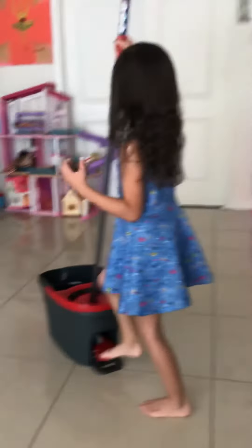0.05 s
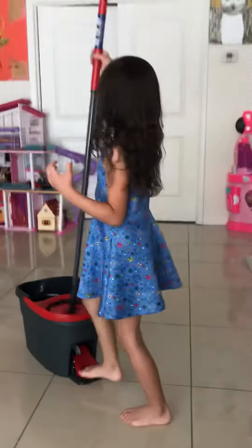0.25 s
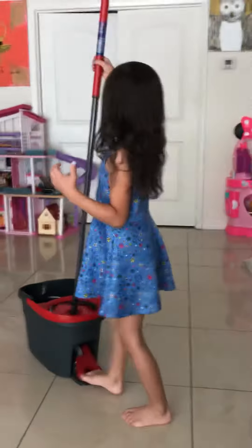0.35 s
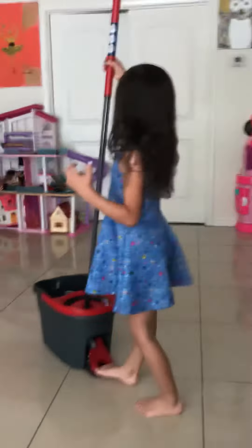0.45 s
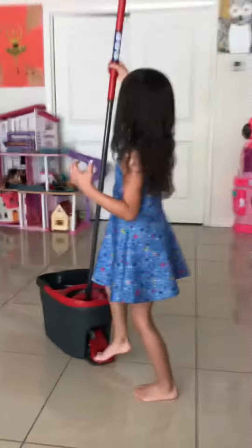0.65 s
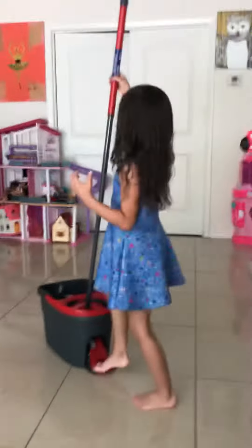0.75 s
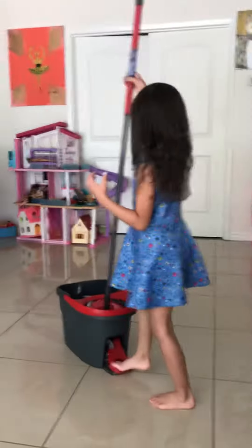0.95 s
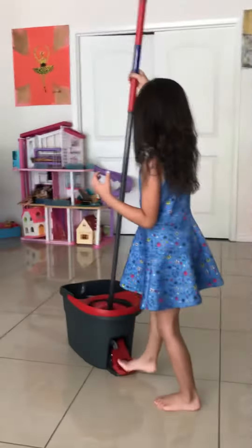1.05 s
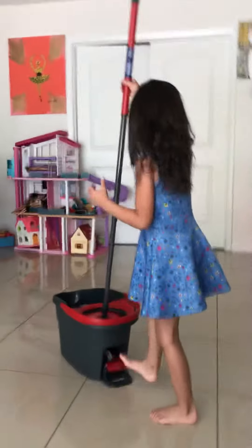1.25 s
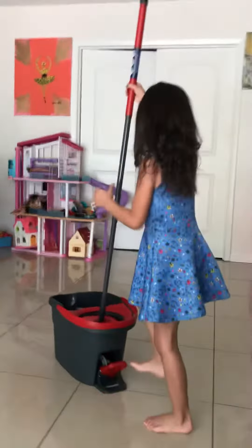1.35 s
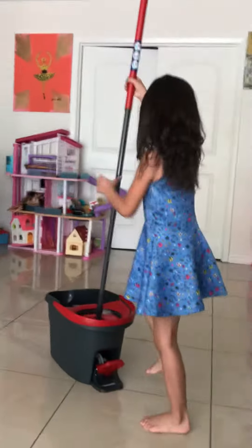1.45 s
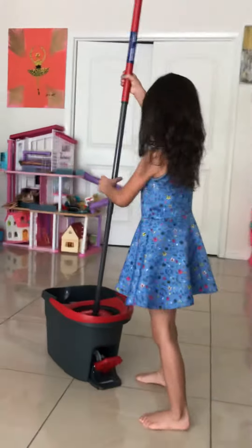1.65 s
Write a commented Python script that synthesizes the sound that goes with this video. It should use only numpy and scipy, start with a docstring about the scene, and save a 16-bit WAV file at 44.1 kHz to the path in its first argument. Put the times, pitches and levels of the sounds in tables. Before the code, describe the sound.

A plastic mop bucket pedal is pressed down with a knock, then clacks back up.

```python
"""One microphone in a live tiled room, a plastic spin-mop bucket on the floor, a faint hum behind it.
The tub is still ringing from a pedal stroke as we come in. At 0.2 s the pedal is trodden down: the
gear rack whirrs and hits its stop. The mechanism ticks, and at 0.84 s a bare foot pats the floor.
At 1.25 s the pedal is let go: the rack rattles back and the pedal clacks against the tub, which
rings hollow into the room."""
import sys
import numpy as np
from scipy import signal
from scipy.fft import rfft, irfft, next_fast_len
from scipy.io import wavfile

SR = 44100
rng = np.random.default_rng(int(sys.argv[2]) if len(sys.argv) > 2 else 0)


def digitize_waveform(pressure):
    """Quantize a signal to 16-bit integers and store it at the path in sys.argv[1].

    Rows of a 2-D input are taken as channels; values are limited to [-1, 1].
    """
    field = np.atleast_2d(pressure).T
    bounded = np.clip(field, -1, 1)
    quanta = np.round(bounded * 32767).astype(np.int16)
    wavfile.write(sys.argv[1], SR, quanta)


N = 74970
LEAD = SR // 4  # samples before time zero, so an earlier stroke can ring on
M = N + LEAD
T = np.arange(M) / SR

def amp(db):
    """Gain of a level in dB."""
    return 10 ** (np.asarray(db) / 20)

def along(points, hz):
    """Read a curve of (Hz, value) points on a log frequency axis."""
    freqs, values = np.transpose(points)
    return np.interp(np.log(hz + 1e-6), np.log(freqs), values)

def norm(x):
    """Scale to energy 1."""
    return x / (np.linalg.norm(x) + 1e-12)

def fade(t60):
    """Exponential decay, 60 dB down after t60 seconds."""
    return np.exp(-np.minimum(np.log(1000) * T / t60, 20))

def rise(seconds):
    """Soft onset with this time constant."""
    return 1 - np.exp(-T / seconds)

def at(start, x):
    """Start x at a time in seconds."""
    return np.pad(x, (max(0, LEAD + round(start * SR)), 0))[:M]

def coloured(x, points, size=4096):
    """Minimum-phase filter through (Hz, dB) points."""
    gain = amp(along(points, np.fft.rfftfreq(size, 1 / SR)))
    cepstrum = irfft(np.log(gain))
    cepstrum[1:size // 2] *= 2
    cepstrum[size // 2 + 1:] = 0
    return signal.oaconvolve(x, irfft(np.exp(rfft(cepstrum))))[:M]

def burst(t60):
    """Dying noise of energy 1."""
    return norm(rng.standard_normal(M) * fade(t60))

def wobble(step):
    """Random drift that turns every step samples."""
    knots = rng.standard_normal(M // step + 2)
    return np.interp(np.arange(M) / step, np.arange(len(knots)), knots)

# The room's air at the microphone. Each row: frequency in Hz, relative level in dB.
AIR_COLOUR = [(20, -51), (40, -15.5), (65, -2), (95, -7), (125, -14.5), (160, -10.5), (220, -20.5),
              (370, -12), (550, -19), (1000, -24), (1400, -25.5), (2200, -28.5), (4500, -34.5), (9000, -40),
              (15500, -49.5)]
def room_tone(hum_hz=60.1):
    """The bed under everything: steady air noise and a low hum."""
    air = coloured(rng.standard_normal(M), AIR_COLOUR)
    hum = np.sqrt(2) * np.sin(2 * np.pi * hum_hz * T)
    return amp(-52.5) * air / air.std() + amp(-65.5) * hum

# How long the tiled room holds a sound. Each row: frequency in Hz, t60 in seconds.
ROOM_T60 = [(100, 0.54), (350, 0.97), (700, .8), (1300, 0.91), (2800, 0.75), (5000, 0.77), (8000, 0.66),
            (15000, 0.56)]
def echo(gap_s=.005):
    """Dense early reflections and the room's tail reach the microphone just after the direct sound."""
    hz, t, spectrum = signal.stft(rng.standard_normal(M), SR, nperseg=256)
    decay = np.exp(-np.log(1000) * t / along(ROOM_T60, hz)[:, None])
    tail = signal.istft(spectrum * decay, SR, nperseg=256)[1][:M]
    early = amp(-8) * burst(t60=.33)
    return (norm(tail) + early) * np.clip(T / gap_s - 1, 0, 1)

def in_room(x, room_db):
    """The direct sound plus what the walls send back."""
    return x + amp(room_db) * signal.oaconvolve(x, echo())[:M]

# Skin slapping tile, and the thud under it. Each row: frequency in Hz, gain in dB.
SLAP_COLOUR = [(300, -2), (1200, 4), (2500, -1.5), (4300, -8), (5500, -5), (7400, -12), (9000, -6.5),
               (11000, -21), (15000, -28)]
THUD_COLOUR = [(30, -19), (90, -3), (250, -9), (480, -3), (700, -23), (2000, -42), (6000, -69)]
def bare_foot(start=.8364):
    """A foot pats the tile: a small slap and a soft thud, dry enough to sound close."""
    slap = amp(-10.5) * at(start, coloured(burst(t60=.0035), SLAP_COLOUR))
    thud = amp(9.5) * at(start + .001, coloured(-1. * (T == 0), THUD_COLOUR))
    return in_room(slap + thud, room_db=-16.5)

# Loose plastic parts. Each row: start in seconds, level in dB, pitch in Hz, t60 in seconds.
TICKS = [(.012, -11, 3470, 0.017), (.111, -19, 3030, 0.019), (0.2311, -15, 4000, .02),
         (.585, -29.5, 9200, .015), (0.651, -22, 3760, 0.047), (.672, -8.5, 2180, 0.11),
         (0.7147, -12.5, 3300, 0.032), (.849, -21, 2800, .015), (1.002, -29, 3000, 0.017),
         (1.132, -18, 1400, 0.035), (1.144, -15, 2210, 0.045), (1.151, -5, 2040, 0.098),
         (1.288, -5, 3000, .015), (1.521, -34, 9000, 0.0091)]
# The spectrum of one tick. Each row: multiple of the pitch, gain in dB.
TICK_SHAPE = [(.06, -10), (.18, 0), (.33, -3.5), (.7, 0), (1, 3), (1.35, -3), (1.9, -11.5), (4, -26.5),
              (8, -36)]
def linkage_ticks():
    """Light contacts of the mop and the pedal linkage, with the room around them."""
    ticks = np.zeros(M)
    for start, db, hz, t60 in TICKS:
        colour = [(hz * multiple, gain) for multiple, gain in TICK_SHAPE]
        ticks += amp(db) * at(start, coloured(burst(t60), colour))
    return in_room(ticks, room_db=-3)

def friction_tone(hz, t60, waver):
    """Rubbing parts give a dying tone of unsteady pitch."""
    pitch = hz * (1 + waver * wobble(step=120))
    return np.sin(2 * np.pi * np.cumsum(pitch) / SR) * fade(t60) * rise(.00062)

def rack(effort, colour, teeth_hz, scrape_db):
    """Teeth click past unevenly, with some scraping between them, and shake the housing."""
    teeth_passed = np.cumsum(teeth_hz * np.exp(.3 * wobble(step=100))) / SR
    clicks = np.diff(np.floor(teeth_passed), prepend=0) * amp(rng.normal(0, 2, M))
    grind = norm(clicks - clicks.mean()) + amp(scrape_db) * norm(rng.standard_normal(M))
    times, levels = np.transpose(effort)
    force = amp(np.interp(T - LEAD / SR, times, levels, left=-120, right=-120))
    return coloured(grind * force, colour) / coloured(grind, colour).std()

# Surges of the gear. Each row: start in seconds, relative level in dB.
GEAR_SURGES = [(.2028, -7), (.2315, -0.5), (.253, -3.5), (.268, -2), (.284, -1.5)]
# Force on the rack going down. Each row: time in seconds, relative level in dB.
DRIVE_EFFORT = [(.203, -4), (.235, -1.5), (.3, 1.5)]
# The housing under load. Each row: frequency in Hz, gain in dB.
DRIVE_COLOUR = [(70, -35), (160, -1.5), (390, -5.5), (500, -7.5), (690, 4), (900, -12.5), (1300, -7.5),
                (1650, -21.5), (3700, -28.5), (6500, -42.5), (15000, -49)]
def rack_down():
    """The trodden pedal drives the whirring rack, and the gear groans in surges."""
    groan = sum(amp(db) * at(start, friction_tone(hz=696, t60=.15, waver=.031))
                for start, db in GEAR_SURGES)
    teeth = rack(DRIVE_EFFORT, DRIVE_COLOUR, teeth_hz=330, scrape_db=-2.5)
    return in_room(amp(-27.5) * groan + amp(-31) * teeth, room_db=-4)

# Force on the rack sliding back. Each row: time in seconds, relative level in dB.
RETURN_EFFORT = [(1.255, -16), (1.263, -21), (1.267, -7), (1.285, -8), (1.301, 0.5)]
# The housing on the way back. Each row: frequency in Hz, gain in dB.
RETURN_COLOUR = [(100, -26), (470, 6.5), (750, -7), (1400, 2), (2200, -6), (3900, -11), (5000, -13),
                 (6200, -21), (8000, -30), (9000, -26), (11500, -26.5), (15000, -36)]
# Squeaks of the slide. Each row: start in seconds, pitch in Hz, level in dB, t60 in seconds.
SQUEAKS = [(1.2648, 5100, -34.5, 0.055), (1.267, 4600, -48, 0.1), (1.265, 7900, -49, 0.09),
           (1.2648, 1900, -40, .06), (1.266, 1380, -62, .1)]
def rack_back():
    """The spring pulls the rack back, rattling fast and squeaking."""
    teeth = rack(RETURN_EFFORT, RETURN_COLOUR, teeth_hz=1101, scrape_db=.5)
    squeak = sum(amp(db) * at(start, friction_tone(hz, t60, waver=.016))
                 for start, hz, db, t60 in SQUEAKS)
    return in_room(amp(-28.5) * teeth + squeak, room_db=0)

def strokes(contacts, gap_s=.1):
    """Contacts in quick succession make one stroke: its start and its strongest level."""
    rows = np.array(contacts)
    groups = np.split(rows, 1 + np.flatnonzero(np.diff(rows[:, 0]) > gap_s))
    return [(group[0, 0], group[:, 1].max()) for group in groups]

def knock(contacts, colour, wall_db, wall_t60, room_db):
    """Each contact is a sharp push and a brief rattle of the plastic wall; each stroke fills the room."""
    push = T == 0
    direct = sum(amp(db) * at(start, push + amp(wall_db) * burst(wall_t60)) for start, db in contacts)
    room = sum(amp(db + room_db) * at(start, echo()) for start, db in strokes(contacts))
    return coloured(direct + room, colour)

def tub_ring(contacts, modes):
    """The tub's modes swell and fade once a stroke, wavering slightly."""
    tones = np.zeros(M)
    for hz, db, t60 in modes:
        phase = 2 * np.pi * (hz * T + rng.random()) + .5 * wobble(step=900)
        tones += amp(db) * fade(t60) * np.sin(phase)
    return sum(amp(db) * at(start, tones * rise(.0032)) for start, db in strokes(contacts))

# The pedal meeting its bottom stop. Each row: start in seconds, relative level in dB.
PRESS_CONTACTS = [(0.3009, -14), (0.3042, -0.5), (0.3066, -3.5), (0.3127, -7.5), (.333, -15.5)]
# The knock of that stop. Each row: frequency in Hz, gain in dB.
PRESS_COLOUR = [(60, -28), (150, -5.5), (300, -5.5), (520, -2.5), (850, 1), (1350, 4), (1700, -8),
                (2000, -5.5), (2600, -7), (3300, -12), (4500, -21), (6800, -25), (8200, -31.5),
                (15000, -43.5)]
# Modes of the lever, and of the tub pressed onto the tiles.
# Each row: frequency in Hz, relative level in dB, t60 in seconds.
LEVER_MODES = [(930, -5.5, 0.016), (1306, 1.5, 0.014), (2526, -9.5, 0.017)]
PRESSED_TUB_MODES = [(146, -8.5, 0.27), (217, 3, .35), (360, -3, .6), (430.5, -1, 0.64), (623, 4, 0.68),
                     (801, 8, 0.43), (926, -1.5, .5), (1029, 9, 0.41), (1280, -15, .4), (1360, 3, 0.29),
                     (1500, -22.5, 0.54), (1465, 5, .4)]
def pedal_hits_stop():
    """The pedal bottoms out: the lever clacks, the plastic knocks and the loaded tub rings."""
    clack = sum(amp(db) * fade(t60) * np.sin(2 * np.pi * hz * T) for hz, db, t60 in LEVER_MODES)
    lever = sum(amp(db) * at(start, clack * rise(.00062)) for start, db in PRESS_CONTACTS)
    stop = knock(PRESS_CONTACTS, PRESS_COLOUR, wall_db=-.61, wall_t60=.029, room_db=8.5)
    ring = tub_ring(PRESS_CONTACTS, PRESSED_TUB_MODES)
    return amp(-6) * lever + amp(11.5) * stop + amp(-34) * ring

# The pedal springing against the tub, first just before time zero.
# Each row: start in seconds, relative level in dB.
RELEASE_CONTACTS = [(-.14, 0.5), (1.3018, 2.5), (1.3036, 2.5), (1.3066, 2.5), (1.3088, -4)]
# The knock, the bright first touch and the hollow boom. Each row: frequency in Hz, gain in dB.
RELEASE_COLOUR = [(60, -44), (150, -28), (300, -8.5), (480, -7), (750, -3.5), (1000, -5), (1500, -1),
                  (2200, -0.5), (3300, -8.5), (5200, -10), (6300, -22), (8500, -23), (12000, -33.5),
                  (15500, -43)]
SNAP_COLOUR = [(1000, -27), (5000, -19), (9000, -10), (11500, 2), (13300, -12), (15000, -9.5), (16000, -6)]
BOOM_COLOUR = [(60, -33), (130, -11.5), (200, -3), (320, -2.5), (470, 1), (750, -5.5), (1000, 0.5),
               (1350, -4.5), (2000, -28), (4000, -32), (12000, -54)]
# Modes of the free tub. Each row: frequency in Hz, relative level in dB, t60 in seconds.
FREE_TUB_MODES = [(262.5, -10.5, 0.32), (337.7, -3.5, 0.41), (440, -4, 0.33), (475.2, 3, 0.38),
                  (624, -11.5, 0.46), (898, -2, 0.29), (974, 4.5, 0.43), (1024, 0, 0.48),
                  (1427, -4.5, 0.59), (1720, -10, 0.53), (1860, -8.5, 0.4), (4330, -17, .6)]
def pedal_hits_tub(boom_lag_s=.009):
    """The freed pedal cracks against the tub, which booms and rings out into the room."""
    hits = strokes(RELEASE_CONTACTS)
    crack = knock(RELEASE_CONTACTS, RELEASE_COLOUR, wall_db=6.1, wall_t60=.016, room_db=6)
    touch = sum(amp(db) * at(start, burst(t60=.004)) for start, db in hits)
    snap = coloured(touch, SNAP_COLOUR)
    shudder = sum(amp(db) * at(start + boom_lag_s, burst(t60=.094) + amp(-4) * echo())
                  for start, db in hits)
    boom = coloured(shudder, BOOM_COLOUR)
    ring = tub_ring(RELEASE_CONTACTS, FREE_TUB_MODES)
    return amp(6) * crack + amp(-5) * snap + amp(18) * boom + amp(-30) * ring

def scene():
    """Room, foot and bucket at one microphone, from time zero on."""
    background = room_tone() + bare_foot() + linkage_ticks()
    bucket = rack_down() + pedal_hits_stop() + rack_back() + pedal_hits_tub()
    return (background + bucket)[None, LEAD:]

def record(dry):
    """The recorder keeps nothing above its band limit."""
    top_hz = 16100
    size = next_fast_len(N + SR // 2)
    passband = np.fft.rfftfreq(size, 1 / SR) < top_hz
    return irfft(rfft(dry, size) * passband, size)[:, :N]

dry = scene()
out = record(dry)
digitize_waveform(out)
```